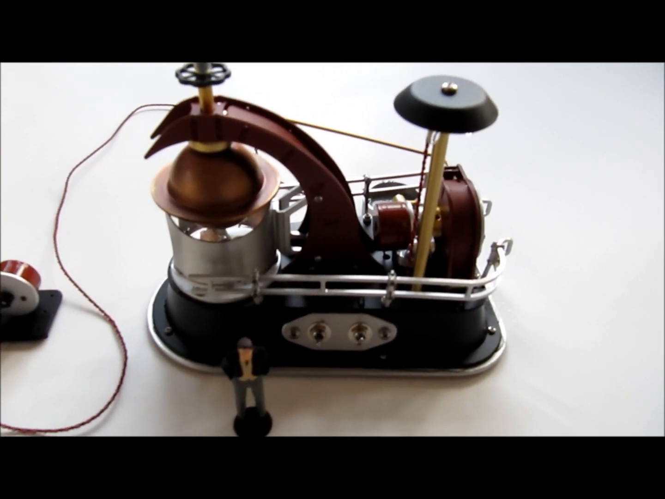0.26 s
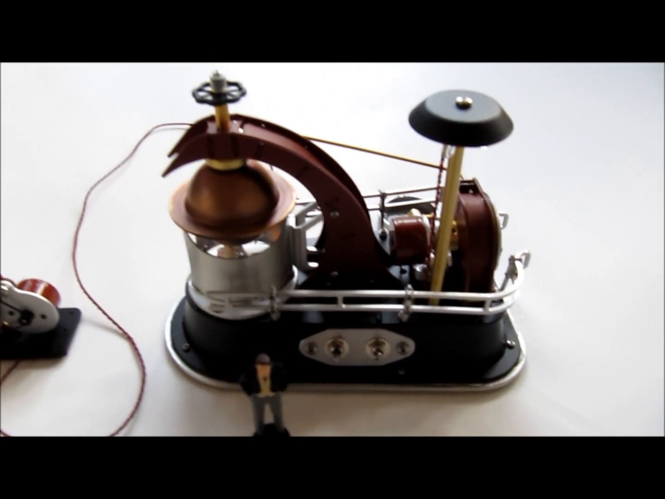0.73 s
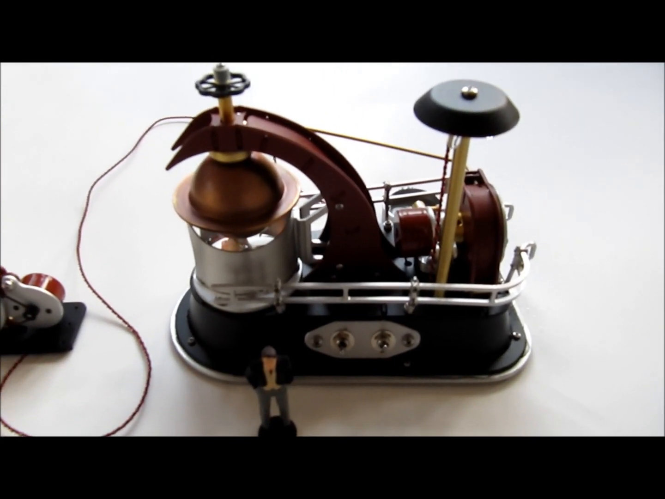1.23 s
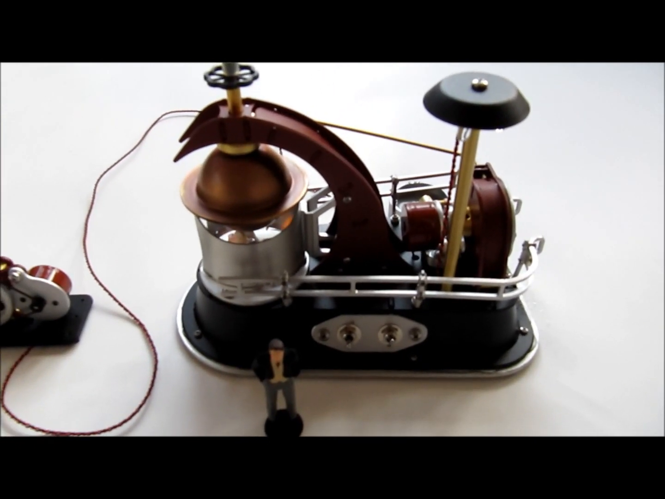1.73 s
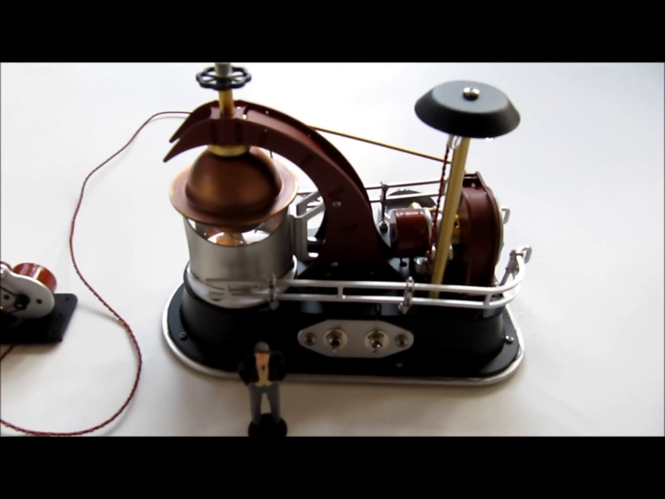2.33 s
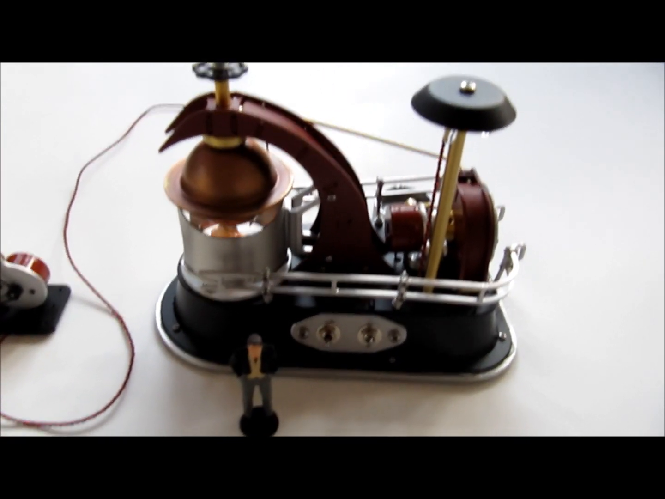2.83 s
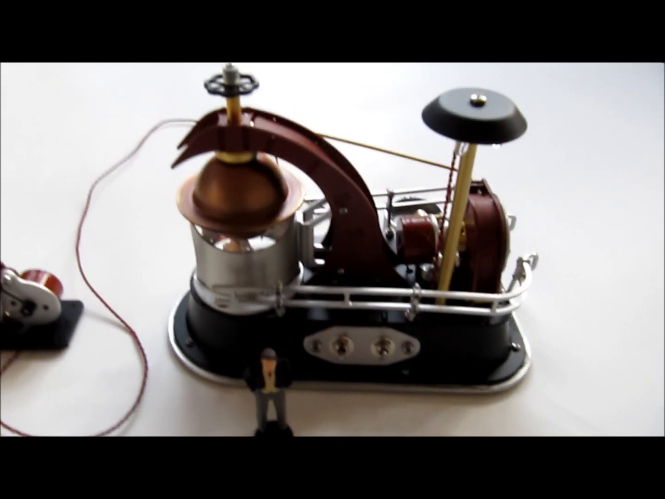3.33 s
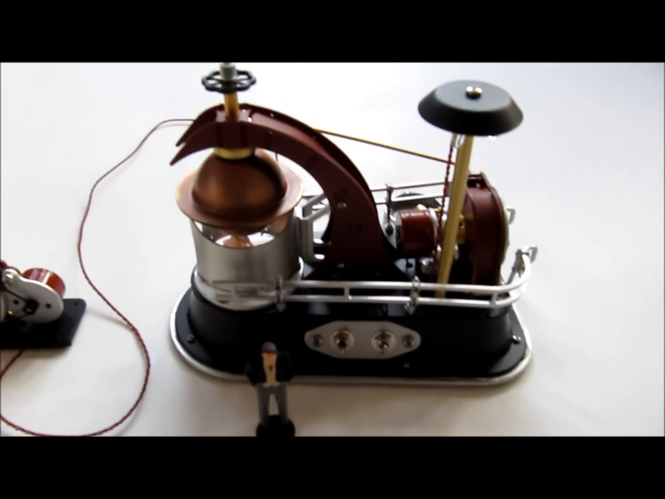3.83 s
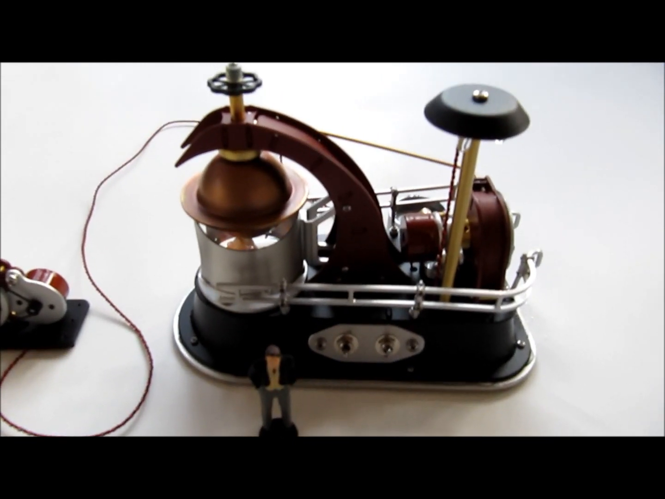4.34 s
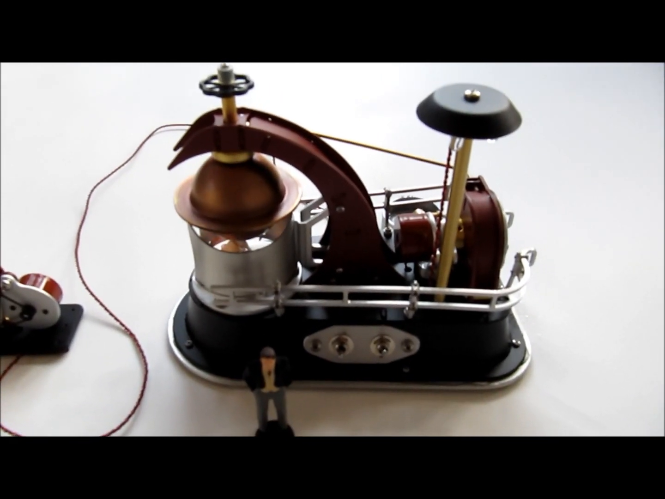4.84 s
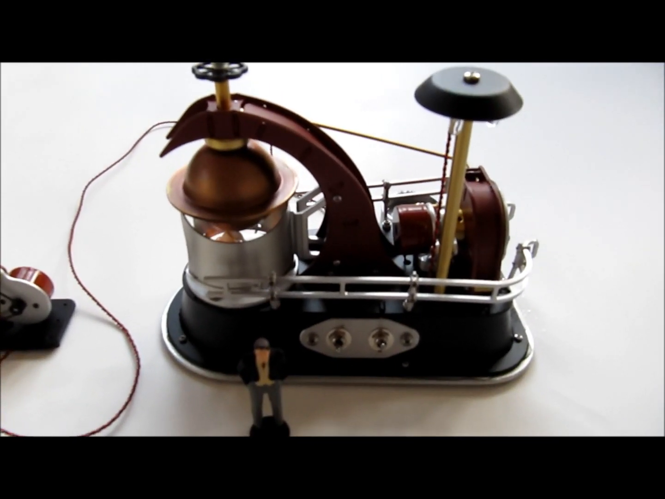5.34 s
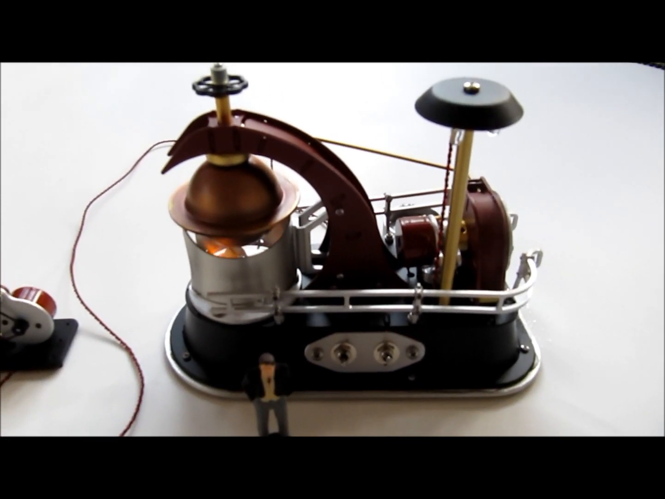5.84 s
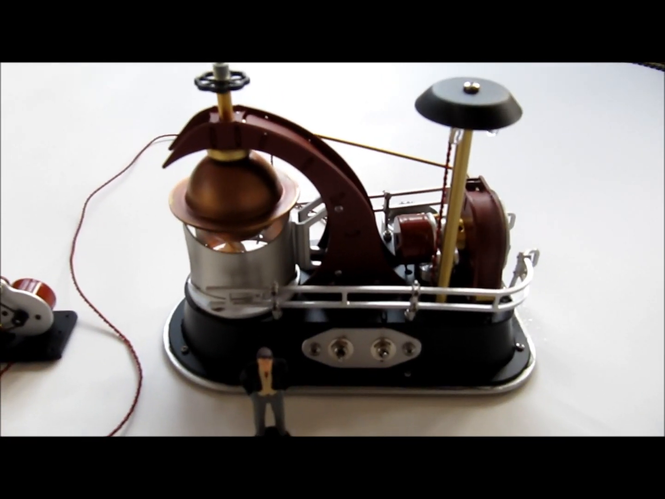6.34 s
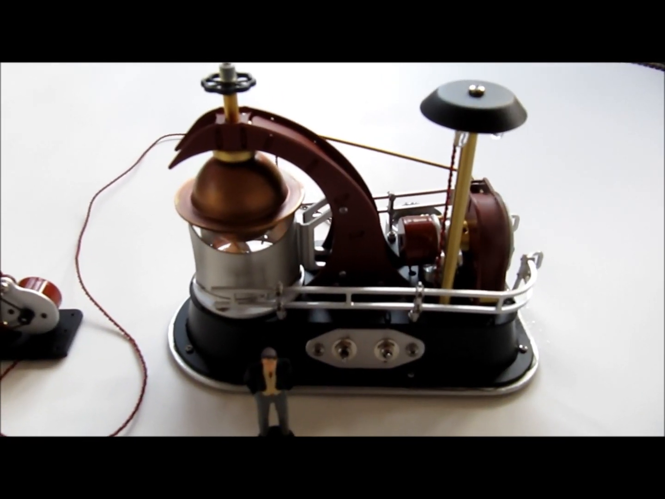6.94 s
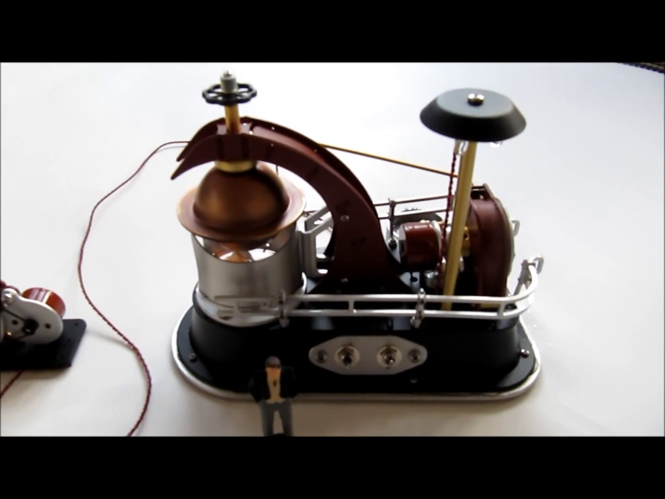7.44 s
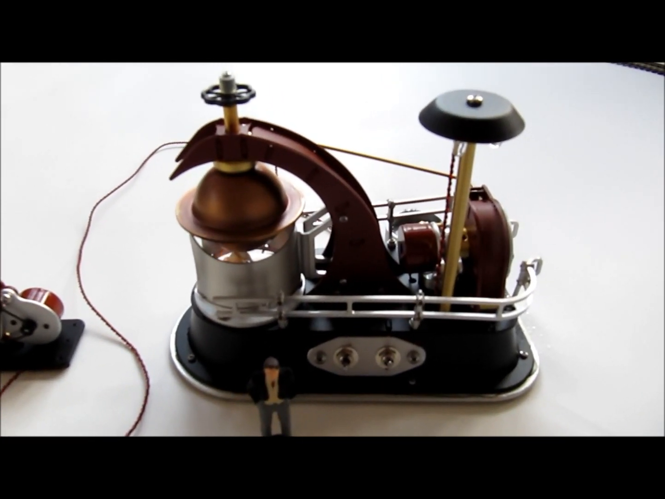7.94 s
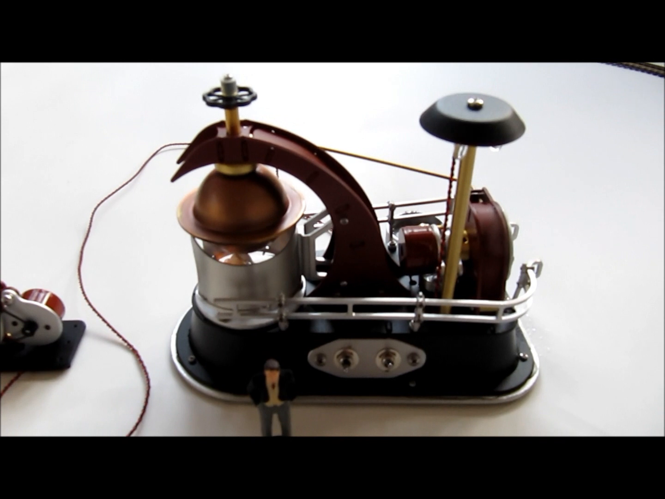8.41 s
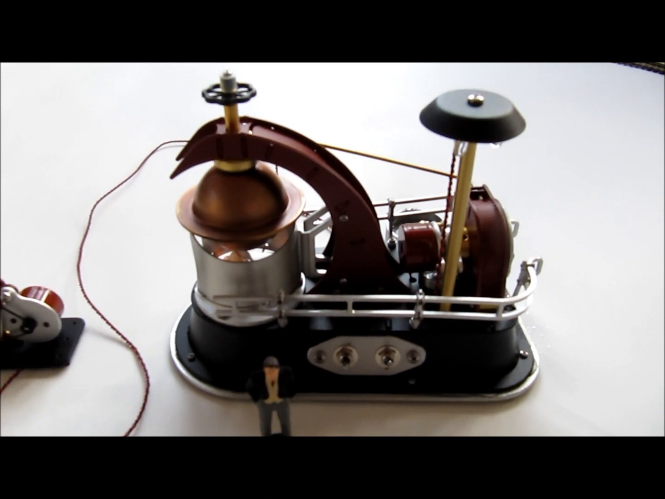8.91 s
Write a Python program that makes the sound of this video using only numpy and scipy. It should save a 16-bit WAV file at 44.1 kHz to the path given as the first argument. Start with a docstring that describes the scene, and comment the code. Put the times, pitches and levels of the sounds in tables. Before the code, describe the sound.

Steam hisses hard and spits from a small model turbine while its rotor whine climbs from low hum to piercing tone, shaft knocking later.

```python
"""Model steam turbine spinning up

A small steam turbine on a table, heard close by one microphone. The steam jet is noise through the
casing resonances, with bursts of water; the rotor whine is near sines that climb in pitch. Later the
shaft knocks in its bearing, ringing housing and bearing modes. Hand movements thump and rumble in
the microphone, and gain control ducks the loud moments."""
import sys
import numpy as np
from scipy import signal
from scipy.fft import rfft, irfft
from scipy.io import wavfile

SR = 44100
rng = np.random.default_rng(int(sys.argv[2]) if len(sys.argv) > 2 else 0)


def materialize(psi):
    """Save the field psi as 16-bit PCM at rate SR to the path in sys.argv[1].

    A 1-D psi becomes a single channel; in a 2-D psi each row is a channel.
    """
    bounded = np.clip(np.atleast_2d(psi).T, -1, 1)
    quanta = np.round(bounded * 32767).astype(np.int16)
    wavfile.write(sys.argv[1], SR, quanta)


N = 404397


def from_db(db):
    """Gain for a level in dB."""
    return 10 ** (np.asarray(db) / 20)


def rms_one(x):
    """Scale to rms 1."""
    return x / np.sqrt(np.mean(x ** 2) + 1e-20)


def in_time(rows):
    """Join each table column by straight lines over time, one value a sample."""
    start_s, *columns = np.transpose(rows)
    return [np.interp(np.arange(N) / SR, start_s, column) for column in columns]


def drift(rate_hz):
    """Slow random wander of spread 1: noise smoothed by two poles, computed every 40 samples."""
    r = np.exp(-80 * np.pi * rate_hz / SR)
    noise = rng.standard_normal(N // 40 + 2002)
    slow = signal.lfilter([1], [1, -2 * r, r * r], noise)[2000:]   # drop the settling of the filter
    return np.interp(np.arange(N) / 40, np.arange(len(slow)), rms_one(slow))


def butter(x, hz, kind, order=2):
    """Butterworth filter."""
    return signal.sosfilt(signal.butter(order, hz, kind, fs=SR, output="sos"), x)


def shelf(x, hz, low_db, high_db):
    """Separate gains below and above hz; the two halves join without a dip."""
    low = butter(butter(x, hz, "low", order=4), hz, "low", order=4)
    high = butter(butter(x, hz, "high", order=4), hz, "high", order=4)
    return from_db(low_db) * low + from_db(high_db) * high


def resonance(x, hz, width_hz):
    """Two-pole resonant band with gain 1 at its top."""
    r = np.exp(-np.pi * width_hz / SR)
    poles = [1, -2 * r * np.cos(2 * np.pi * hz / SR), r * r]
    return signal.lfilter([(1 - r * r) / 2, 0, (r * r - 1) / 2], poles, x)


def ring(clicks, hz, t60_s):
    """A unit click sets a decaying sine of starting height 1 ringing."""
    r, w = from_db(-60 / (t60_s * SR)), 2 * np.pi * hz / SR
    return signal.lfilter([0, np.sin(w)], [1, -2 * r * np.cos(w), r * r], clicks + 1e-18)


def clicks_at(times_s, db):
    """One single-sample click per time."""
    out = np.zeros(N)
    out[(np.asarray(times_s) * SR).astype(int)] = from_db(db)
    return out


# low handling rumble, before its low-pass: [start_s, level_db]
RUMBLE_LEVEL = [(0.0, -46), (0.23, -47), (0.92, -54), (1.3, -47.5), (1.99, -56), (2.12, -47), (2.32, -52.5),
                (3.24, -44), (3.6, -51.5), (7.17, -70.5), (9.17, -61)]
# thumps on the microphone body: [start_s, tick_db, ring_db, ring_hz, t60_s]
BODY_THUMPS = [(0.021, -49, -42, 294, 0.066), (0.198, -40, -32.5, 282, 0.053), (0.421, -36, -53, 250, .02),
               (1.242, -33, -33, 120, 0.019), (1.248, -38, -31.5, 286, 0.038), (3.01, -32, -33, 250, .04),
               (3.069, -17.5, -12, 132, 0.011), (3.188, -42, -33, 149, 0.028),
               (3.1987, -25, -27, 99, 0.027), (3.315, -34, -33, 243, 0.031)]


def handling():
    """Each thump is a quick inward tick, then a dull decaying ring; lumpy low rumble lies below."""
    rumble = butter(rng.standard_normal(N), 26, "low", order=1)
    rumble = rms_one(butter(rumble, 2.7, "high"))
    level_db, = in_time(RUMBLE_LEVEL)
    out = from_db(level_db + 1.6 * drift(13)) * butter(rumble, 350, "low")
    for start_s, tick_db, ring_db, ring_hz, t60_s in BODY_THUMPS:
        out -= ring(clicks_at([start_s], tick_db + 9.5), 580, 0.0032)
        out += ring(clicks_at([start_s + 0.0012], ring_db), ring_hz, t60_s)
    return out


# spells of shaft knocking; ring and click levels are before the mode balance:
# [first_s, end_s, spacing_turns, scatter_turns, low_ring_db, bright_click_db]
KNOCK_SPELLS = [(5.174, 5.74, .4, .06, -36, -32), (5.777, 6.16, .5, .015, -30, -21),
                (6.168, 6.41, .5, .03, -32, -24), (6.418, 6.75, .5, .04, -33, -28),
                (6.761, 7.09, .5, .07, -33, -26), (7.109, 7.58, .79, .06, -35, -29),
                (7.600, 7.94, .8, .07, -34, -24), (7.957, 8.16, 1, .02, -34, -27),
                (8.177, 8.32, 1, .03, -35, -24), (8.337, 8.42, 1, .02, -28, -22),
                (8.434, 8.7, 1, .03, -32, -23), (8.714, 8.8, 1, .05, -34, -22),
                (8.820, 9.13, 1, .06, -31, -22)]
WHINE_CYCLES_PER_TURN = 60   # number of blades
KNOCK_SPREAD_DB = 2.2
BOUNCE_SHARE, BOUNCE_S, BOUNCE_LOSS_DB = .2, .014, 1.5


def knock_times():
    """Knocks spaced in shaft turns, some spells regular, others scattered; some knocks bounce once."""
    t = np.arange(N) / SR
    whine_hz = in_time(ROTOR_ORDERS)[0]
    turns = np.cumsum(whine_hz) / SR / WHINE_CYCLES_PER_TURN
    rows = []
    for first_s, end_s, spacing, scatter, low_db, click_db in KNOCK_SPELLS:
        first_turn, end_turn = np.interp([first_s, end_s], t, turns)
        at = np.arange(first_turn, end_turn, spacing)
        late, strength, click = rng.standard_normal((3, len(at)))
        s = np.interp(at + scatter * late, turns, t)
        ring_levels = low_db + KNOCK_SPREAD_DB * strength
        click_levels = click_db + KNOCK_SPREAD_DB * (strength + click)   # clicks vary on their own too
        levels = np.vstack([ring_levels, click_levels])
        bounces = (rng.random(len(at)) < BOUNCE_SHARE) & (spacing > 2 / 3)   # only widely spaced ones
        rows.append(np.vstack([s, levels]))
        rows.append(np.vstack([s + BOUNCE_S, levels - BOUNCE_LOSS_DB])[:, bounces])
    return np.hstack(rows)


# low modes of the housing: [pitch_hz, relative_db, t60_s]
HOUSING_MODES = [(850, 3.5, 0.071), (895, -3, 0.066), (1000, -9.5, 0.11), (2016, -1.5, 0.027)]
# bright modes of the bearing: [pitch_hz, relative_db, t60_s]
BEARING_MODES = [(2720, -9, 0.032), (3010, -3, 0.016), (3496, -3.5, 0.017), (3810, -4.5, 0.012),
                 (5840, 2, 0.0077)]
MODE_SPREAD_DB = 1.5


def knocks():
    """Each knock strikes every mode with its own strength; the housing follows the bright click."""
    s, low_db, click_db = knock_times()
    low, bright = np.zeros(N), np.zeros(N)
    for hz, mode_db, t60_s in HOUSING_MODES:
        chance_db = MODE_SPREAD_DB * rng.standard_normal(len(s))
        low += ring(clicks_at(s, low_db + mode_db + chance_db), hz, t60_s)
    for hz, mode_db, t60_s in BEARING_MODES:
        chance_db = MODE_SPREAD_DB * rng.standard_normal(len(s))
        bright += ring(clicks_at(s - .0012, click_db + mode_db + chance_db), hz, t60_s)
    # the light frame radiates no bass
    return butter(low, 957, "high", order=8) + butter(bright, 2650, "high", order=4)


# rotor orders, levels as rms: [start_s, whine_hz, whine_db, second_order_db, fourth_order_db]
ROTOR_ORDERS = [(1.3, 89, -59.5, -70, -71), (1.85, 186.3, -54, -65, -75), (2.45, 303.8, -49.5, -59.5, -70),
                (2.9, 408.5, -48.5, -63, -72), (3.3, 503, -39, -66, -65), (3.65, 594, -38.5, -58, -65),
                (4.25, 765, -43, -48, -63.5), (4.7, 881, -50, -47.5, -70), (5.24, 1040, -41, -53, -72),
                (5.75, 1180, -41.5, -51, -60), (6.1, 1262, -40.5, -41, -65),
                (6.36, 1334.2, -45.5, -38.5, -55), (6.75, 1431, -42, -48, -48),
                (7.1, 1536, -32.5, -48, -48), (7.47, 1638, -28.5, -45.5, -53), (7.9, 1747, -32, -46, -39),
                (8.3, 1858, -31.5, -48, -38), (8.65, 1935, -26.5, -48, -36), (8.98, 2024, -30, -44, -46),
                (9.17, 2062, -26.5, -47, -55)]
# the whine itself drops out briefly: [middle_s, depth_db, length_s]
WHINE_DROPOUTS = [(2.718, 12, 0.037), (4.495, 11, 0.035), (4.679, 19, 0.032), (4.743, 15, .03),
                  (6.29, 16, .05), (6.56, 18, 0.077), (6.625, 14, 0.016), (7.32, 4, 0.051),
                  (7.513, 2.5, 0.042), (7.761, 28, 0.038), (8.137, 4, 0.038), (8.321, 7, 0.046),
                  (8.39, 33, .05), (8.5, 8.5, 0.029)]
START_S, FADE_IN_S = 1.1, .24


def whine():
    """Near sines on the rotor orders, slightly unsteady, silent until the wheel turns."""
    hz, first_db, second_db, fourth_db = in_time(ROTOR_ORDERS)
    t = np.arange(N) / SR
    for middle_s, depth_db, length_s in WHINE_DROPOUTS:
        first_db = first_db - depth_db * np.exp(-(2 * (t - middle_s) / length_s) ** 2)
    phase = 2 * np.pi * np.cumsum(hz * (1 + 0.002 * drift(33.6))) / SR
    tones = from_db(first_db + 1.47 * drift(63) + 1.04 * drift(24)) * np.sin(phase)
    tones += from_db(second_db + 1.5 * drift(17)) * np.sin(2 * phase)
    tones += from_db(fourth_db + 1.9 * drift(28)) * np.sin(4 * phase)
    return np.sqrt(2) * tones * np.clip((t - START_S) / FADE_IN_S, 0, 1)   # sqrt 2: sine rms to peak


# broad hiss between the resonances: [pitch_hz, relative_db]
HISS_COLOUR = [(60, -30.5), (100, -32.5), (350, -36), (750, -49), (1450, -25), (1600, -21.5), (2350, -29.5),
               (4000, -17.5), (4500, -12.5), (6300, -11), (9400, -11), (10600, -10), (12900, -31),
               (15700, -63)]
# casing resonances, balance shifting as the microphone moves:
# [centre_hz, width_hz, earlier_db, later_db], levels relative
CASING_MODES = [(984, 94, -28.5, -23.5), (1115, 124, -31, -21), (1680, 69, -48, -13.5),
                (2008, 196, -21.5, -15), (2712, 214, -12, -11.5), (3204, 230, -35, -13.5),
                (3806, 67, -26, -12), (4693, 148, -4, -6), (5346, 250, -9.5, -6.5), (5655, 175, -6, -8),
                (5947, 300, -13, -3.5), (6575, 115, -6.5, -6), (7570, 1000, -14, -12), (8200, 510, -4, -25),
                (8590, 820, -14, -8), (9095, 78, 4.5, -5), (9110, 157, -23, -2.5), (9540, 800, -10.5, -3.5),
                (11120, 440, -8.5, -26.5), (11200, 81, -24, -17), (11760, 250, -9, -24),
                (12520, 110, -8, -16), (13700, 270, -44, -39), (16000, 390, -53, -21)]
# dips where paths to the microphone cancel:
# [centre_hz, width_hz, earlier_depth, halfway_depth, later_depth], depths 0-1
PATH_DIPS = [(1450, 250, .4, .2, .3), (2330, 300, .5, .4, .6), (4000, 250, .4, .6, .5),
             (6250, 300, .3, .5, .5), (6490, 100, .6, .2, .4), (6980, 250, .5, .4, .4),
             (8050, 200, .4, .3, .5), (8850, 150, .6, .3, .5), (10180, 250, .5, .7, .3),
             (10450, 200, .6, .4, 0), (10750, 450, 0, .1, .8), (11750, 400, .65, .6, .75),
             (12720, 350, 0, .7, .2), (13020, 500, .6, 0, .7), (14330, 500, .4, .5, .4)]


def casing_hiss(later):
    """Jet noise, broad and in the casing resonances, each band flickering on its own; rms 1."""
    hz = np.maximum(np.arange(N // 2 + 1) * SR / N, 1)
    knots_hz, levels_db = np.transpose(HISS_COLOUR)
    colour = from_db(np.interp(np.log(hz), np.log(knots_hz), levels_db))
    broad = irfft(rfft(rng.standard_normal(N)) * colour, N)
    white = rng.standard_normal((2, N))   # neighbouring resonances take turns at two noises
    out = broad * from_db(drift(25))
    for k, (centre_hz, width_hz, early_db, late_db) in enumerate(CASING_MODES):
        level_db = early_db + (late_db - early_db) * np.clip(later, 0, 1)
        out += resonance(white[k % 2], centre_hz, width_hz) * from_db(level_db + 0.83 * drift(14))
    for centre_hz, width_hz, *depths in PATH_DIPS:
        depth = np.interp(later, [0, .5, 1], np.clip(depths, 0, .9))
        out -= depth * resonance(out, centre_hz, width_hz)
    return rms_one(out)


# water spits, rms before the final filters: [start_s, level_db, length_s, extra_body_db]
WATER_SPITS = [(0.396, -27, 0.0032, 4), (1.995, -16, 0.0044, -2), (2.255, -13, 0.0013, 3.5),
               (2.827, -21.5, 0.0055, 15), (2.843, -18, .004, 8), (2.874, -7, .0015, -9),
               (2.893, -9, 0.0058, -0.5), (3.323, -12.5, 0.0081, 2), (3.683, -13.5, 0.0062, 0),
               (3.874, -15, 0.0053, 3.5), (4.209, -18, 0.0075, 3), (4.387, -14.5, .0055, -2),
               (4.657, -16, 0.0027, -3), (4.718, -13, 0.0077, -6), (5.058, -14.5, 0.0068, 1),
               (5.086, -14, 0.0068, -0.5), (5.098, -16, .003, -13), (5.125, -14, 0.0073, -5),
               (5.262, -12, .0015, -5), (5.378, -13.5, 0.0059, -2.5), (5.434, -14, 0.01, 0.5),
               (5.7437, -10.5, 0.01, -7), (7.004, -12, .010, -1), (7.574, -14, 0.0097, 0.5),
               (8.23, -15.5, .004, 2.5)]
BODY_HZ = 5130   # the extra body lies below this


def water(hiss, flow_db):
    """Plugs of water gate the hiss in short bursts; random single droplets crackle in the jet."""
    wet = from_db(1.3 * drift(240)) * butter(hiss, 8500, "low", order=1)   # duller than the dry hiss
    gate, body_db = np.zeros(N), np.zeros(N)
    t = np.arange(2000) / SR
    for start_s, level_db, length_s, extra_db in WATER_SPITS:
        age, start = t / max(length_s, .001), int(start_s * SR)
        body_db[start + np.flatnonzero(age < 2)] = extra_db
        plug = np.tanh(9 * age) * np.exp(-age ** 4)   # quick start, flat top, abrupt end
        wet_rms = np.std(wet[start + np.flatnonzero(age < 1)])
        gate[start:start + len(t)] += from_db(level_db) * plug / wet_rms
    drops = (rng.random(N) < 40 / SR) * np.minimum(rng.exponential(0.59, N), 2.5)   # 40 a second
    gate += from_db(flow_db) * signal.lfilter([1], [1, -.97], drops)
    return butter(gate * shelf(wet, BODY_HZ, body_db, 0), 1060, "high", order=3)   # spits carry no bass


# steam jet: [start_s, flow_db, later_colour_share 0-1, extra_treble_db, extra_roar_db]
STEAM_JET = [(0, -22, 0.1, -2, 3), (1, -21, 0.06, 0, 3.5), (1.4, -19.5, 0, -2, 2),
             (1.85, -19.5, 0, -2, 1.5), (2.2, -19, 0.01, -3, 2), (2.6, -19.5, 0, 0, -1),
             (2.8, -15.5, 0.08, -4, 2.5), (3.05, -13.5, 0.2, -6, 1), (3.3, -16, 0.55, 0, -4),
             (3.8, -19, 0.7, 3, -19), (4.2, -19, 0.73, 1, -11), (4.4, -21, 0.77, -1, -2.5),
             (5.0, -20.5, 0.88, -0.5, -2), (5.3, -23, 0.75, -1, 1), (6, -22.5, 0.86, 5, 3.5),
             (7, -22, 0.95, -2, 0), (8, -22, 0.95, 0.5, 1), (9.17, -21, 0.99, 0, -1)]
TREBLE_HZ, ROAR_HZ = 12800, 1090


def steam():
    """The jet's flow sets the level of turbulent hiss, top treble and low roar; water rides on it."""
    flow_db, later, treble_db, roar_db = in_time(STEAM_JET)
    hiss = shelf(casing_hiss(later), TREBLE_HZ, 0, treble_db)
    hiss += (from_db(roar_db) - 1) * butter(hiss, ROAR_HZ, "low", order=4)
    spitting = water(hiss, flow_db)
    flicker_db = .5 * drift(45) + 0.24 * drift(380)
    return from_db(flow_db + flicker_db) * hiss + spitting


def scene():
    """One microphone feeds both channels."""
    return np.tile(handling() + knocks() + whine() + steam(), (2, 1))


LIMIT_DB, RELEASE_DB_PER_S = -17.5, 4.5
CUTOFF_HZ = 15750


def record(dry):
    """Gain control pulls loud moments down within milliseconds and recovers slowly; the top is cut."""
    loud_db = 10 * np.log10(signal.lfilter([.004], [1, -.996], dry[0] ** 2) + 1e-9)
    slope = RELEASE_DB_PER_S * np.arange(N) / SR
    held_db = np.maximum.accumulate(loud_db + slope) - slope   # peaks held, falling at the release rate
    over_db = np.maximum(held_db - LIMIT_DB, 0)
    attack = 0.006   # share of the way per sample
    gain = from_db(-signal.lfilter([attack], [1, attack - 1], over_db))
    top_cut = signal.ellip(12, .5, 70, CUTOFF_HZ, fs=SR, output="sos")
    return signal.sosfilt(top_cut, dry * gain)


dry = scene()
out = record(dry)
materialize(out)
```